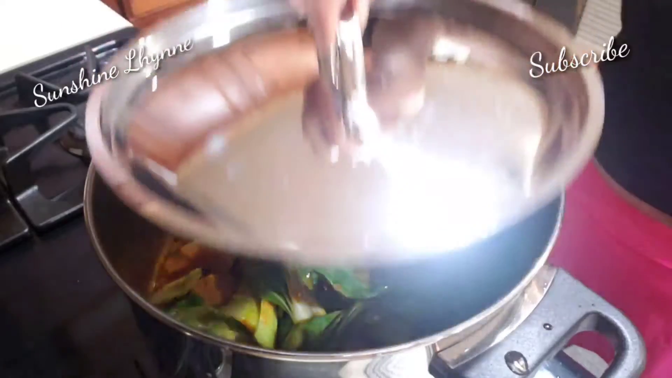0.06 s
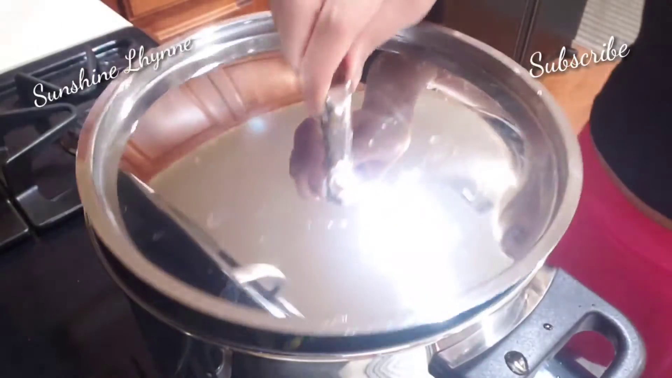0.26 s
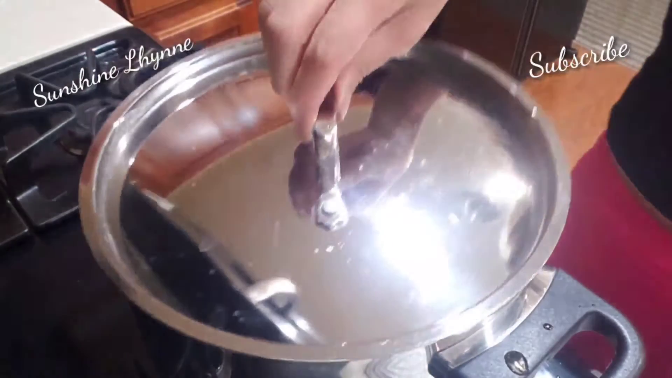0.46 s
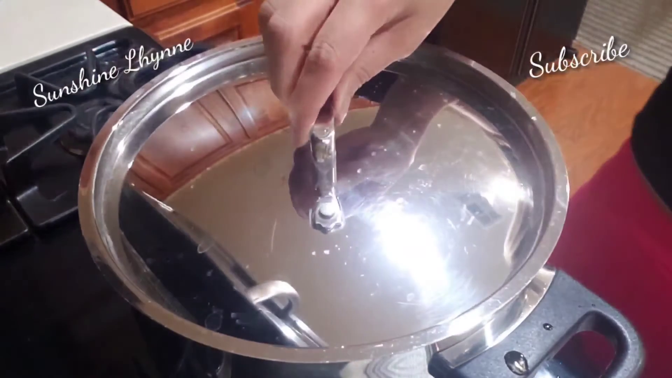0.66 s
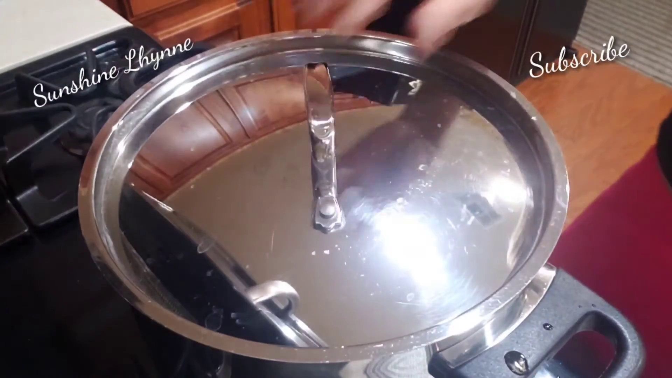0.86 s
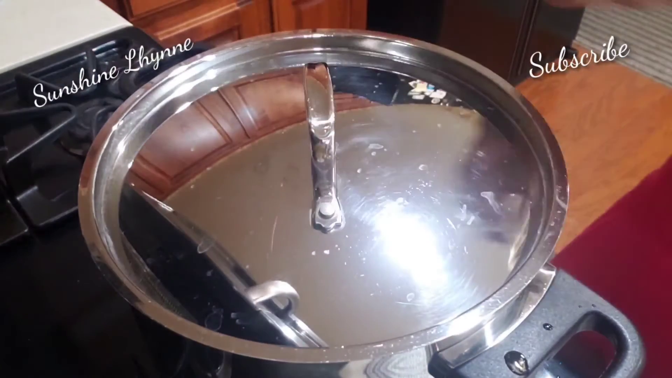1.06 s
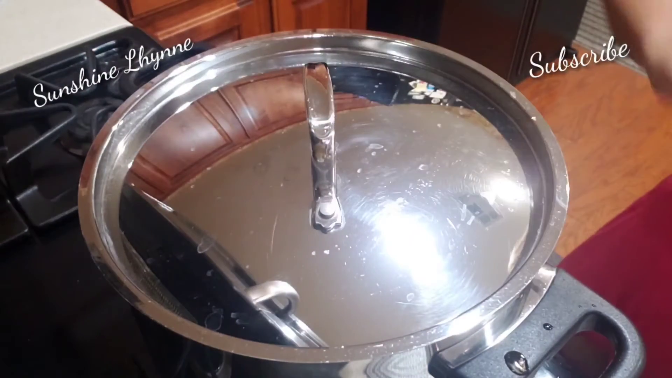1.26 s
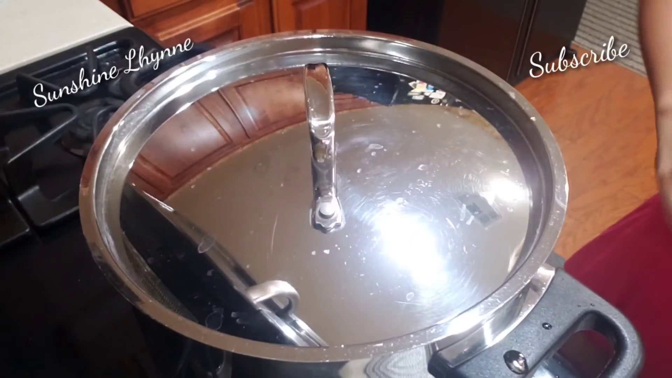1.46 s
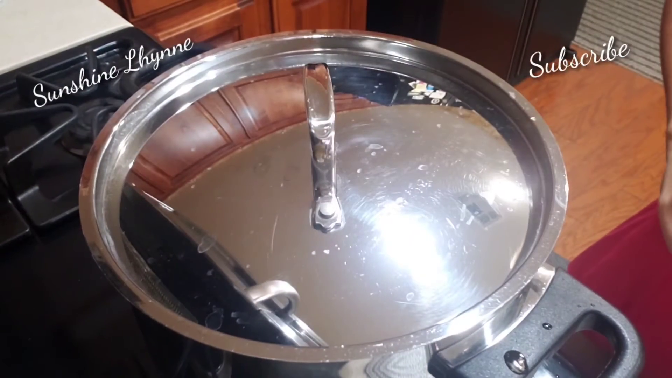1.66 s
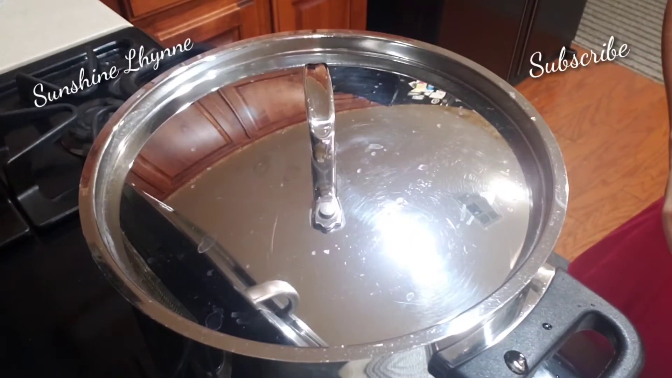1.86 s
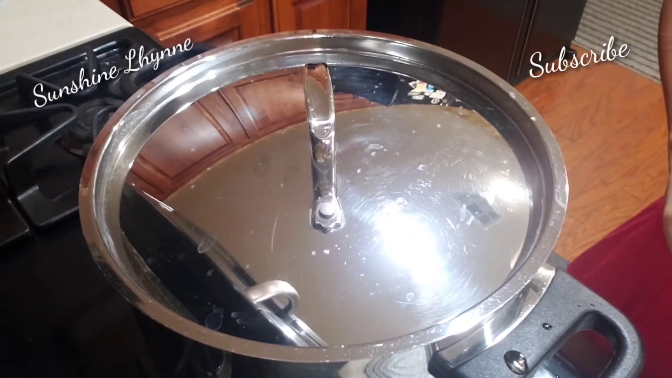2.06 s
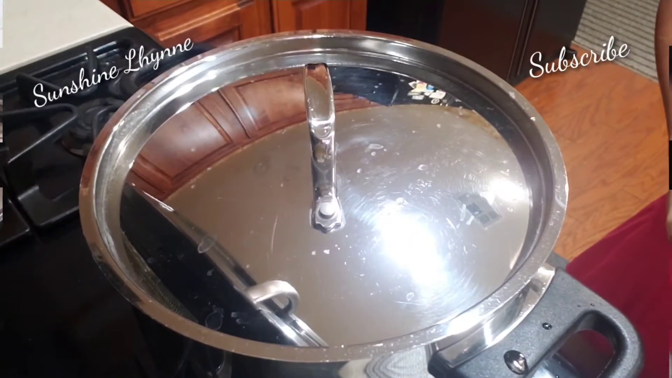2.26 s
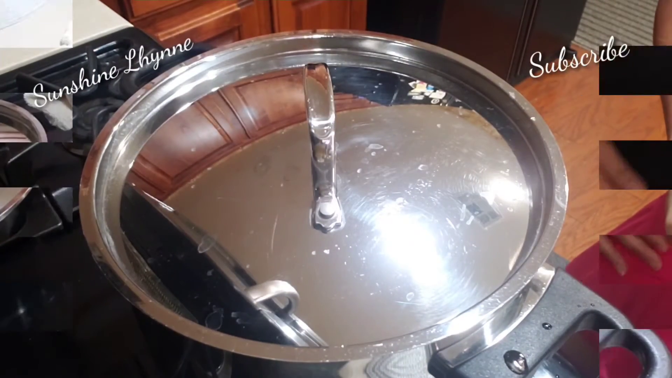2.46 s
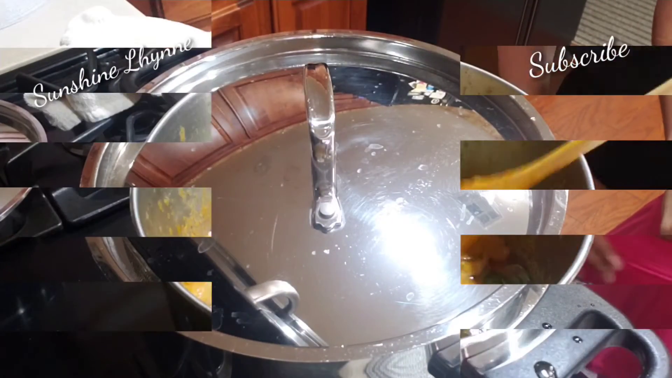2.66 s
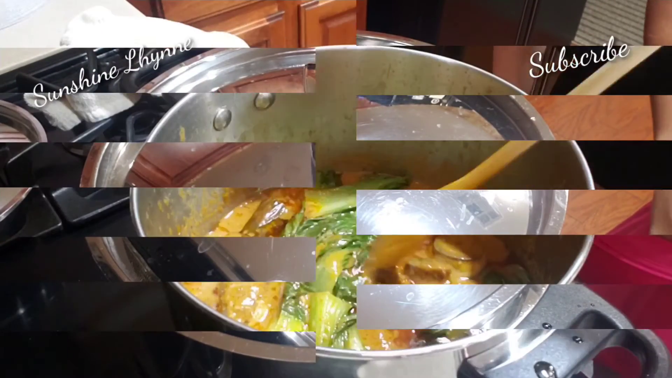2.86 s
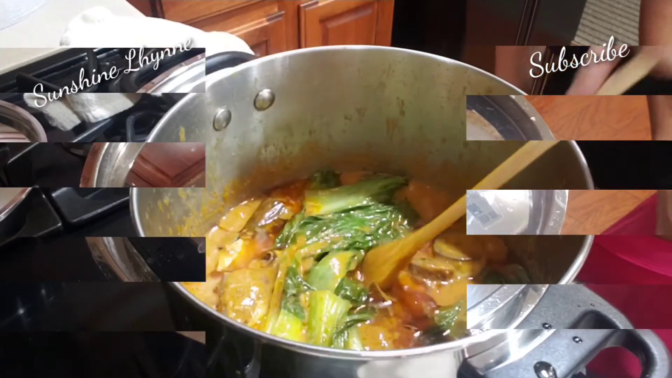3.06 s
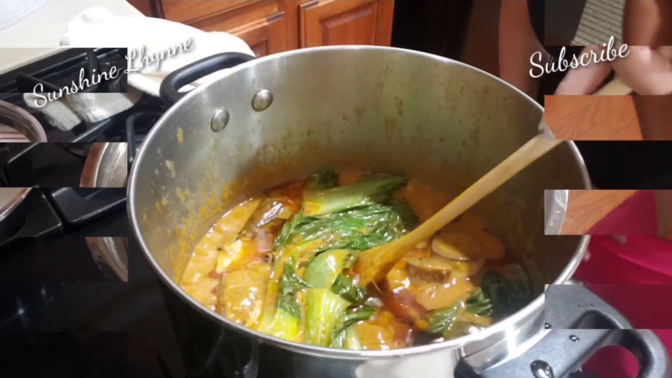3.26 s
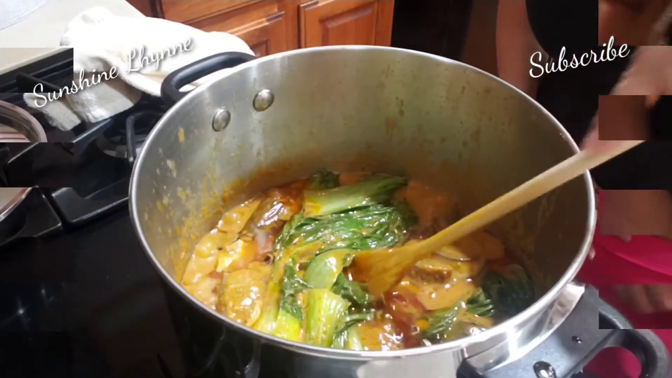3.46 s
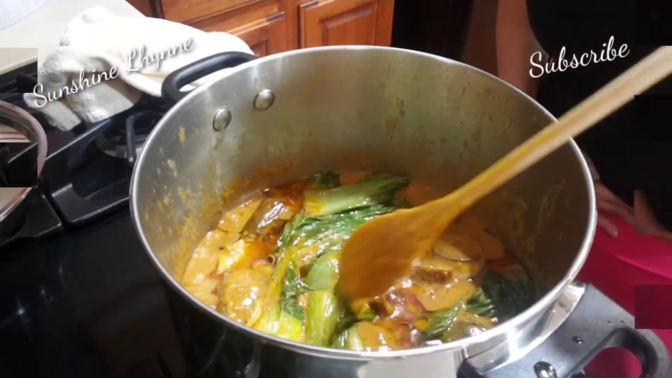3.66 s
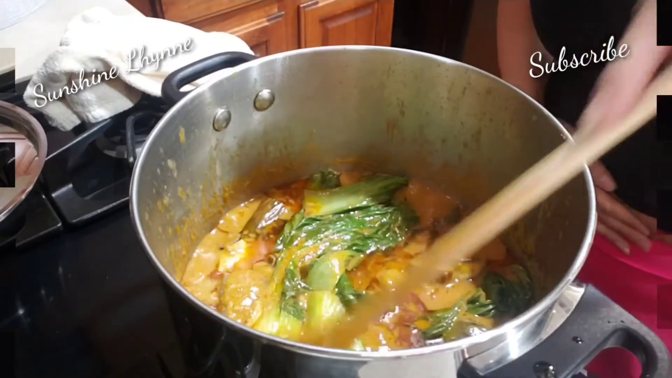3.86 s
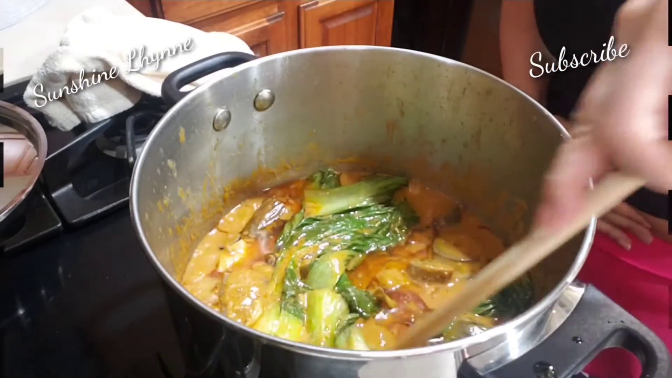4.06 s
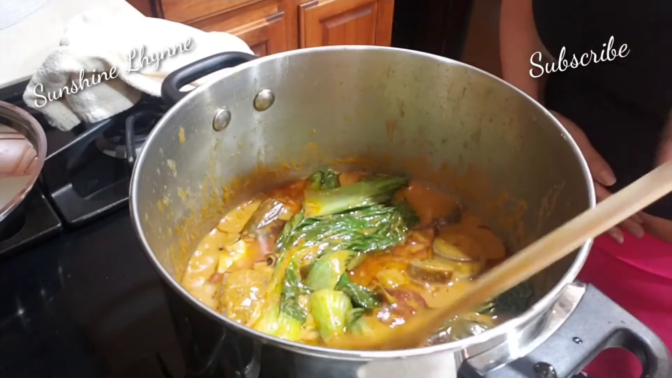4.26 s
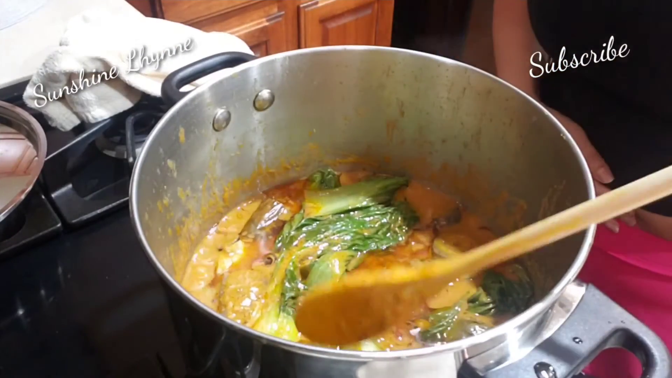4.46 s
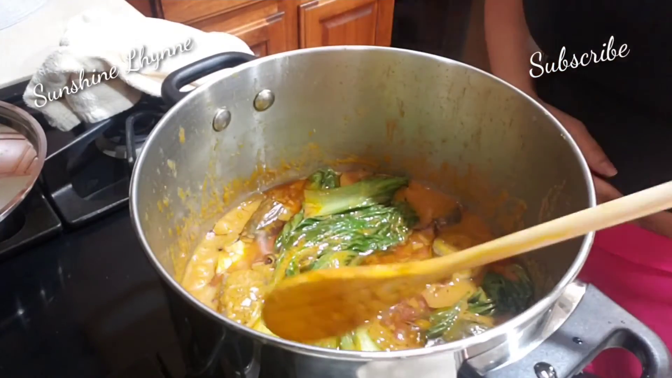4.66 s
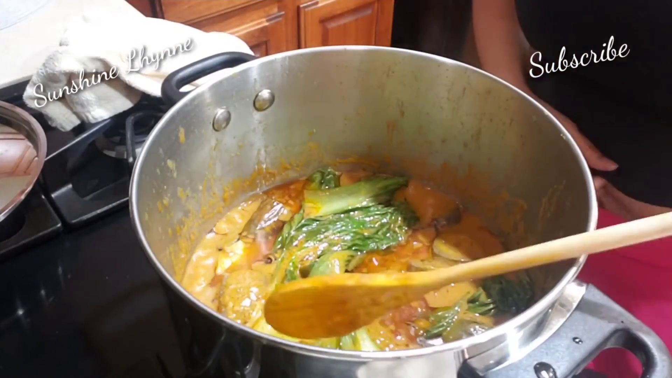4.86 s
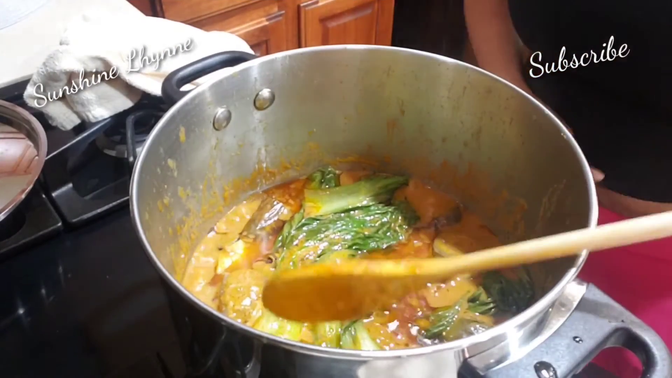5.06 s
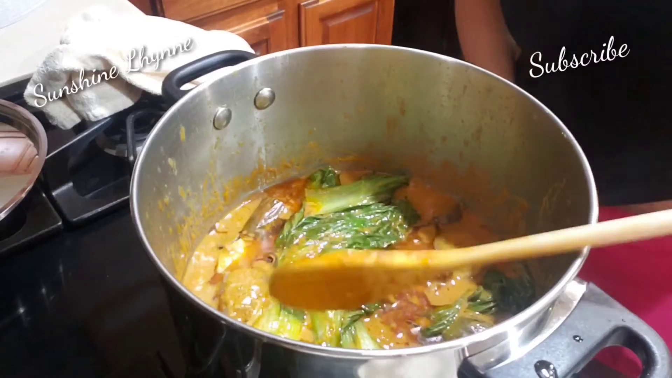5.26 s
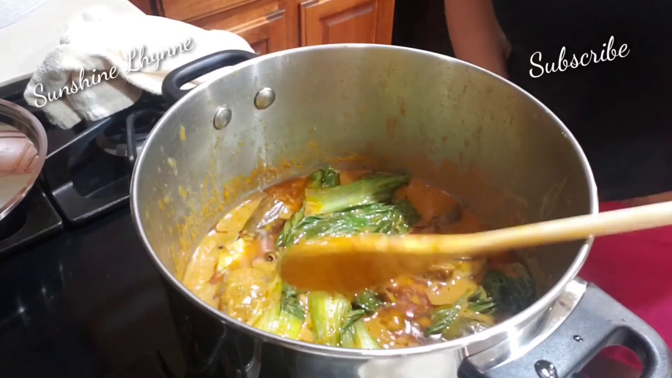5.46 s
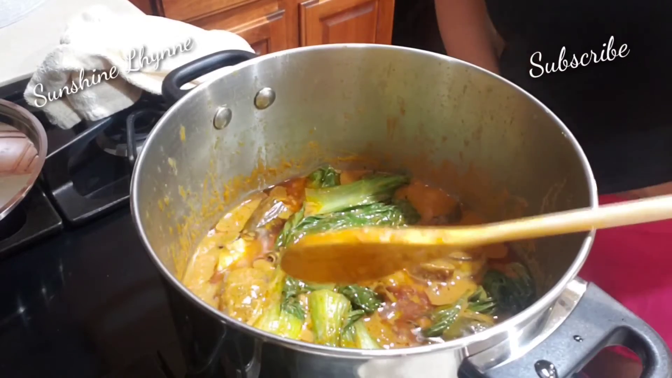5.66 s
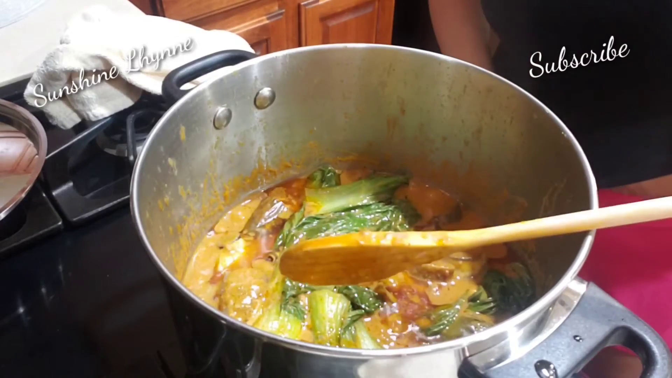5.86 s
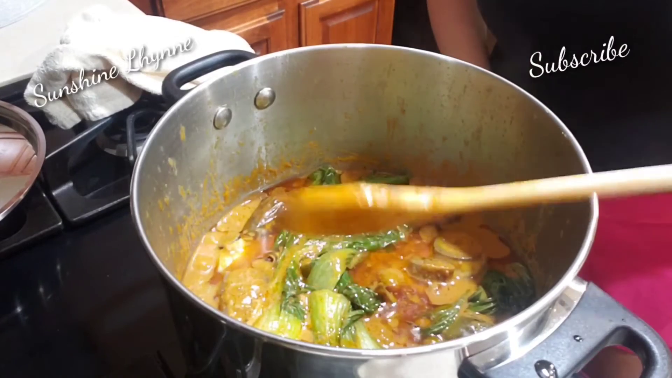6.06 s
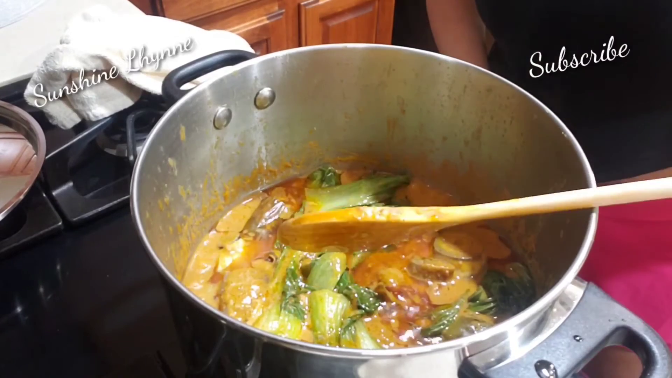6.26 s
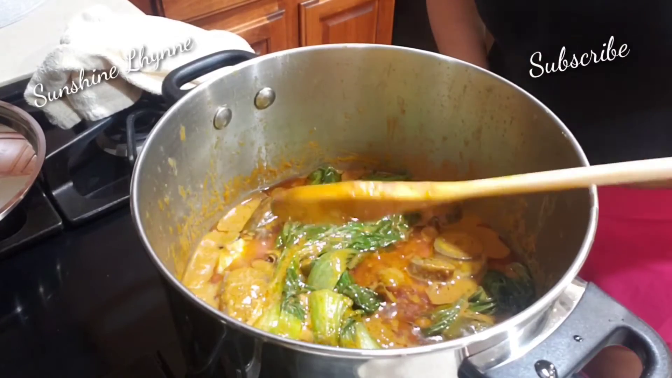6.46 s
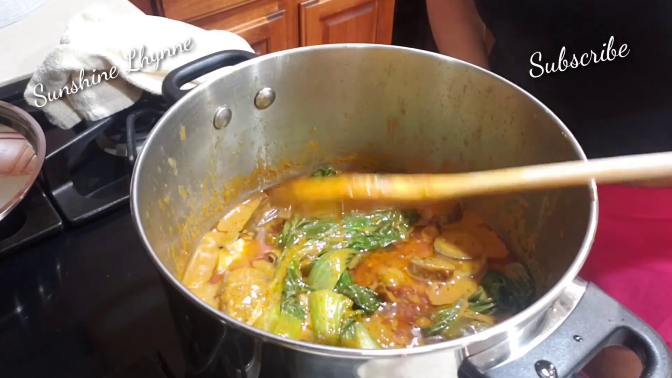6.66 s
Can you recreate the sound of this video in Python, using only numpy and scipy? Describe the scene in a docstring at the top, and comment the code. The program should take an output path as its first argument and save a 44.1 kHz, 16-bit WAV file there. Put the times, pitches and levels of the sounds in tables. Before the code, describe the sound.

A low, wavering appliance hum near 57 Hz, soft rumble and faint hiss run throughout, heard close to a stove in stereo with a short tiled-kitchen echo. Around 0.1 to 0.3 s there is a light knock and small wet pops. At 0.4 to 0.5 s a steel lid touches the pot with ringing taps, then clanks loudly at 0.56 and settles in a rapid clatter at 0.63 to 0.68, its ring soon fading. At 1.6 s it rocks in three weakening ticks. The hum sinks until about 2.9 s, when wet stirring begins: squelch, crackle, tiny pops, soft knocks at 3.3 to 4.1. Stirring thickens, with a sharp crack at 4.94 and wooden raps from 5.2 to 5.9. A hard clank with lasting metallic notes hits at 6.11, another knock at 6.25, then strong pops and a last rap near 6.65. Noise swells briefly after each knock.

```python
"""Close to a stove, in stereo: a wavering appliance hum and faint kitchen noise run throughout.
Light knocks and wet pops come early; a steel lid then meets the pot in eight contacts and settles,
ringing in the modes of its pose, and later rocks in three weaker ticks. After that a wooden spatula drags
through thick stew, with pops, plops, crackle and raps (crack, wood, thud). Near the end hard blows clank
on the pot wall. After each knock the background noise swells and falls back."""
import sys
import numpy as np
from scipy import signal
from scipy.fft import rfft, irfft, next_fast_len
from scipy.io import wavfile
from scipy.ndimage import uniform_filter1d

SR = 44100
rng = np.random.default_rng(int(sys.argv[2]) if len(sys.argv) > 2 else 0)


def dump(signal):
    """Clip the signal to [-1, 1] and save it as 16-bit WAV at the path in sys.argv[1]."""
    limited = np.clip(np.atleast_2d(signal).T, -1, 1)
    pcm = np.round(limited * 32767).astype(np.int16)
    wavfile.write(sys.argv[1], SR, pcm)


N = 296352

# dull body of a knock: (frequency [Hz], relative density [dB per Hz])
THUD = [(59, -17.5), (100, -2.5), (480, 5), (1000, 1), (1400, -14), (2400, -25), (3380, -49.5),
        (17600, -120)]
# dense short ringing of lid on rim: (frequency [Hz], relative density [dB per Hz])
CLATTER = [(41, -44), (70, -6.5), (400, -22.5), (1020, -21.5), (1200, -19.5), (1650, -10), (1980, -25.5),
           (2220, -19), (4800, -29), (5500, -38.5), (6160, -29), (16000, -27)]


def undb(db):
    """Amplitude factor of a level in dB."""
    return 10 ** (np.asarray(db) / 20)


def unit(x):
    """Scale to rms 1."""
    return x / np.sqrt(np.mean(x ** 2))


def noise(spectrum, size, alike_hz=900, lines_db=0.):
    """Coloured noise, alike at both microphones in the bass, unrelated in the treble; lines_db makes it peaky."""
    fast = next_fast_len(size)
    hz = np.arange(fast // 2 + 1) * SR / fast + 1e-3
    at, db = np.transpose(spectrum)
    colour_db = np.interp(np.log(hz), np.log(at), db, left=-90, right=-90)
    # each random peak or dip is eight bins wide
    peaks_db = lines_db * np.repeat(rng.standard_normal(len(hz) // 8 + 1), 8)[:len(hz)]
    mid, side = rfft(rng.standard_normal((2, fast)))
    side = side * hz ** 2 / (hz ** 2 + alike_hz ** 2)
    left_right = np.array([mid + side, mid - side])
    return unit(irfft(undb(colour_db + peaks_db) * left_right, fast))[:, :size]


def walk(rate):
    """Random wander: values held for 1 / rate seconds, then smoothed twice over that time."""
    hold = int(SR / rate)
    steps = np.repeat(rng.standard_normal(N // hold + 1), hold)
    return 0.92 * uniform_filter1d(uniform_filter1d(steps, hold), hold)[:N]


def fade(t60, size):
    """Exponential decay by 60 dB in t60 seconds."""
    return np.exp(-np.log(1000) * np.arange(size) / (max(t60, .002) * SR))


def ring(modes, size, spread=1.0):
    """One blow on a set of modes, each wavering in level and differing in phase between the microphones."""
    beat_hz, beat_share = 9, .35  # the rate is scaled at random for each mode
    t, out = np.arange(size) / SR, np.zeros((2, size))
    for (hz, db, t60), chance in zip(modes, rng.standard_normal((len(modes), 3))):
        strength = undb(db + 1.2 * chance[0])
        shift = spread * chance[1] * min(hz / 1500, 1) * np.array([[.5], [-.5]])
        beat = 1 + beat_share * np.sin(2 * np.pi * beat_hz * chance[2] * t)
        out += strength * fade(t60, size) * beat * np.sin(2 * np.pi * hz * t + shift)
    return out * (1 - np.exp(-t / 0.00065))


def burst(spectrum, db, t60, attack=0.00048, lines_db=7.0):
    """Countless short-lived modes, heard as peaky noise that dies away unevenly."""
    steps = np.repeat(rng.standard_normal(64), 256)
    uneven = undb(2.5 * uniform_filter1d(steps, size=256))
    rise = 1 - np.exp(-np.arange(16384) / (attack * SR))
    return undb(db) * noise(spectrum, 16384, lines_db=lines_db) * fade(t60, 16384) * uneven * rise


def add(out, s, x):
    """Mix x into out from s seconds on."""
    i = int(s * SR)
    out[:, i:i + x.shape[1]] += x[:, :N - i]


def place(x, pan_db, lag):
    """Level difference (left over right) and arrival lag (samples, right later) between the two microphones."""
    left = x[0] * undb(pan_db / 2)
    right = np.roll(x[1], int(round(lag))) * undb(-pan_db / 2)
    return np.array([left, right])


def background_db(s):
    """Level that the hum wavers around at time s; the other steady layers follow it."""
    # hum level over time: (time [s], level [dB])
    hum_level = [(0, -39), (.15, -42), (0.899, -48), (1.3, -50.5), (2.33, -49.5), (2.4, -54.5),
                 (3.201, -52.5), (4.2, -47), (4.9, -42.5), (5.8, -42), (6.72, -41)]
    return np.interp(s, *np.transpose(hum_level))


def appliance_hum(level_db):
    """A low tone and its octave, both unsteady in pitch and level."""
    turn = 2 * np.pi * np.cumsum(56.85 + 1.6 * walk(12)) / SR  # centre and wander in Hz
    waver_db = 2.2 * walk(12)
    octave = undb(-17 + 8.9 * walk(6.6)) * np.sin(2 * turn)
    return np.sqrt(2) * undb(level_db + waver_db) * (np.sin(turn) + octave)


def kitchen_noise(level_db):
    """Wandering low kitchen noise and a steadier hiss, at set distances below the hum."""
    # faint rumble of the kitchen: (frequency [Hz], relative density [dB per Hz])
    rumble_colour = [(41, -35), (70, -4.5), (86, -15), (123, -16), (256, -26), (294, -15), (366, -29),
                     (406, -28.5), (611, -27.5), (669, -37.5), (1500, -57.5), (1950, -87.5), (3300, -120)]
    # faint hiss: (frequency [Hz], relative density [dB per Hz])
    hiss_colour = [(590, -37.5), (1000, -10), (1180, -9), (1350, -12.5), (2100, -8.5), (4170, -17.5),
                   (16000, -20.5)]
    rumble = undb(level_db - 12.5 + 0.5 * walk(10)) * noise(rumble_colour, N)
    return rumble + undb(level_db - 31.5) * noise(hiss_colour, N)


def swelling_noise(swell):
    """Background noise that follows the bass and treble swells, each with its own flicker."""
    # the noise that swells: (frequency [Hz], relative density [dB per Hz])
    swell_colour = [(41, -31.5), (70, -3.5), (223, -6.5), (695, -25.5), (853, -20), (1150, -26),
                    (1280, -23.5), (8090, -46), (10900, -42.5), (16000, -57.5)]
    full = noise(swell_colour, N)
    bass = signal.sosfiltfilt(signal.butter(2, 900, fs=SR, output="sos"), full)
    treble = full - bass
    bass_flicker_db, treble_flicker_db = 3 * walk(30), 3 * walk(60)
    return swell[0] * undb(bass_flicker_db) * bass + swell[1] * undb(treble_flicker_db) * treble


def pop(hz, cycles):
    """A bubble bursting: a few cycles that swell, fade and glide up."""
    turn = np.arange(512) / SR * hz  # in cycles
    envelope = (1 - np.exp(-turn)) * np.exp(-turn / cycles)
    return envelope * np.sin(2 * np.pi * turn * (1 + 0.0074 * turn)) * np.ones((2, 1))


def bubbles():
    """Bursting bubbles, each with a wet hiss, and deeper plops that ring briefly."""
    # wet pops of the stew: (time [s], relative level [dB], starting pitch [Hz])
    wet_pops = [(0.092, -55.5, 6000), (.301, -57.5, 8500), (3.015, -63.5, 10400), (3.078, -60, 9500),
                (3.092, -62, 4500), (3.127, -63, 5570), (3.25, -58.5, 8800), (3.405, -53, 5900),
                (3.885, -55, 10770), (3.2378, -57.5, 11000), (3.274, -58, 5400), (3.3009, -60, 4600),
                (3.85, -51, 3830), (3.9976, -56, 8000), (4.106, -57, 5400), (4.16, -61, 2500),
                (4.1786, -50, 4770), (4.275, -51.5, 6600), (4.29, -58, 3300), (4.5221, -58, 7500),
                (4.61, -54.5, 5440), (4.6728, -57, 7750), (4.699, -44, 9100), (4.7837, -52.5, 4350),
                (4.904, -56, 4900), (5.252, -48.5, 5800), (5.2807, -48, 4560), (5.5593, -59.5, 3730),
                (5.977, -51, 4660), (6.012, -43.5, 3640), (6.089, -46.5, 5570), (6.5362, -39.5, 7110),
                (6.552, -45.5, 3500), (6.572, -50.5, 5330)]
    # deeper plops: (time [s], relative level [dB], pitch [Hz])
    deep_plops = [(4.269, -61, 1600), (4.72, -61, 1580), (4.812, -57, 1850)]
    out = np.zeros((2, N))
    for s, db, hz in wet_pops:
        wet_colour = [(hz / 2.7, -20), (hz, 0), (min(1.6 * hz, 16000), -16)]
        add(out, s, undb(db) * pop(hz, 5.5))
        add(out, s, undb(db - 6) * noise(wet_colour, 2048) * fade(0.037, 2048))
    for s, db, hz in deep_plops:
        plop_colour = [(hz / 2.5, -14), (hz, 0), (3 * hz, -14)]
        add(out, s, undb(db) * ring([(hz, 0, .03), (1.12 * hz, -2, .02)], 4096))
        add(out, s, burst(plop_colour, db - 4, .09, lines_db=3.))
    return out


def dragged_sauce():
    """The blade dragged through the sauce: 300 scattered small pops over four flickering bands of squelch."""
    # strength of the drag: (time [s], relative level [dB])
    drag_level = [(2.8, -76), (3.1, -69.5), (3.5, -73.5), (4.15, -66.5), (4.3, -63), (4.5, -71),
                  (4.75, -60), (4.9, -68), (5.3, -61.5), (6.5, -56.5), (6.72, -66)]
    out = np.zeros((2, N))
    at, db = np.transpose(drag_level)
    for when, pitch, size in rng.random((300, 3)):
        s = at[0] + when * (at[-1] - at[0])
        pop_db = np.interp(s, at, db) - 4 * np.log(size + .02)  # a few come out much louder
        add(out, s, undb(pop_db) * pop(3000 * 4 ** pitch, 4.))
    drag_db = np.interp(np.arange(N) / SR, at, db, left=-120)
    for hz in (3000, 4770, 8000, 12430):
        band = noise([(hz / 2, -18), (hz, 0), (hz * 2, -18)], N)
        out += undb(drag_db - 19 + 6 * walk(30)) * band
    return out


def stew():
    """Bubbles and dragged sauce, reaching the right microphone a little late."""
    return place(bubbles() + dragged_sauce(), 0.27, 14)


def knocks_and_swell():
    """A crack, a thud and, from the blade, ringing wood; also returns the bass and treble swells that follow."""
    # knocks: (time [s], struck by, crack level [dB], thud level [dB])
    knocks = [(0.099, "other", -60, -55.5), (0.632, "other", -62, -23), (1.589, "other", -54.5, -43.5),
              (2.901, "other", -83, -64.5), (3.329, "other", -45.5, -61.5), (3.338, "other", -81, -41.5),
              (3.651, "other", -45.5, -47.5), (3.804, "other", -58, -56), (4.061, "blade", -53.5, -48),
              (4.937, "other", -32, -43.5), (5.165, "blade", -39, -44.5), (5.386, "blade", -32.5, -45),
              (5.602, "blade", -30, -50), (5.652, "blade", -37, -44), (5.812, "blade", -32, -40),
              (5.936, "blade", -51.5, -50), (6.111, "other", -65, -29), (6.245, "other", -26, -43),
              (6.655, "other", -33.5, -42)]
    # sharp onset: (frequency [Hz], relative density [dB per Hz])
    crack_colour = [(180, -40.5), (300, -25.5), (565, -18.5), (1080, -8), (1390, -24.5), (2880, -10.5),
                    (6740, -20.5), (12300, -28.5), (16000, -47)]
    # wooden blade: (frequency [Hz], relative level [dB], decay by 60 dB [s])
    wood_modes = [(1000, 5, 0.13), (1078, 13, 0.05), (2110, 2, 0.035), (2810, 3, 0.04), (4300, -2, 0.025),
                  (7340, 9, 0.012)]
    wood_db = -10  # against the crack
    hold_s, swell_db, faint_swell_db = .12, -0.54, -5.5  # limits: against the hum, against the crack
    boom_db, boom_fade_s = -13.5, .16  # the bass lingers after a thud
    out, swell = np.zeros((2, N)), np.zeros((2, N))
    t = np.arange(32768) / SR
    late = np.maximum(t - hold_s * np.array([[1], [.7]]), 0)  # the treble lets go first
    shape = (1 - np.exp(-t / 0.0058)) * np.exp(-late / np.array([[.06], [.035]]))
    for s, struck_by, crack_db, thud_db in knocks:
        add(out, s, burst(crack_colour, crack_db, 0.05, attack=0.001))
        if struck_by == "blade":
            add(out, s, undb(crack_db + wood_db) * ring(wood_modes, 8192))
        add(out, s, burst(THUD, thud_db, 0.12, attack=0.002, lines_db=4.0))
        peak_db = min(background_db(s) + swell_db, crack_db + faint_swell_db)
        add(swell, s, undb(peak_db) * shape)
        add(swell[:1], s, undb(thud_db + boom_db) * np.exp(-t[None] / boom_fade_s))
    return place(out, 1.4, 14), swell


def tilted_clatter(tilt_db):
    """Clatter colour with its treble above 2 kHz sloped by tilt_db per octave."""
    return [(hz, db + tilt_db * np.log2(max(hz / 2000, 1))) for hz, db in CLATTER]


def lid_contacts():
    """Each contact rings the modes of its pose until a choke time, clatters on the rim and bumps dully."""
    # lid contacts: (time [s], pose, ring level [dB])
    contacts = [(.399, "held", -22), (.434, "held", -29.5), (0.508, "held", -29), (.559, "tilted", -15.5),
                (.628, "seated", -17), (.643, "seated", -17), (.661, "seated", -16),
                (0.679, "seated", -35.5)]
    # the lid rings differently as more of its edge touches the pot:
    # pose -> modes (frequency [Hz], relative level [dB], decay by 60 dB [s])
    pose_modes = {"held": [(320, 0, .09), (430, -13, .12), (1000, -9, .1), (1230, -13, .15),
                  (1629, -10, .5), (1649, -6, .6), (1852, -18, .5), (2417, -17, .4), (2606, -6.5, .75),
                  (3079, -17, 1.5), (3526, -10, .9), (4834, -17, .4), (7335, -20, .2), (7817, -23, .3)],
                  "tilted": [(735, -7, .07), (1050, -8, .07), (1486, 2, .17), (1649, -13, .28),
                  (2606, -15, .9), (3526, -23, .6), (7580, -16, .04), (9798, -25, .15), (10750, -26, .4)],
                  "seated": [(735, -11, .12), (1000, -13, .2), (1050, -13, .16), (1420, -12, .1),
                  (1488, -1, .12), (1640, 0, .13), (1685, 0, .14), (2250, -9, .36), (2697, -17, .28),
                  (3074, -19, .32), (3338, -42, 1.2), (3540, -20, .27), (3978, -16, .21), (4107, -33, .8),
                  (4730, -15, .1), (4990, -47, .7), (6560, -43, .9), (7100, -46, .8), (8350, -44, .7)]}
    # when the next touch stops the ringing: pose -> time [s]
    choke_at = {"held": .557, "tilted": 0.68, "seated": 3}
    # pose -> (level above the ring [dB], decay by 60 dB [s], treble slope [dB per octave])
    pose_clatter = {"held": (-4, 0.26, -4.2), "tilted": (-7.5, .2, -2), "seated": (-0.71, .15, -0.1)}
    out = np.zeros((2, N))
    for s, pose, ring_db in contacts:
        choked = np.maximum(np.arange(40000) / SR - (choke_at[pose] - s), 0)
        clatter_db, t60, tilt_db = pose_clatter[pose]
        add(out, s, undb(ring_db) * ring(pose_modes[pose], 40000) * np.exp(-choked / 0.0087))
        add(out, s, burst(tilted_clatter(tilt_db), ring_db + clatter_db, t60, lines_db=5.5))
        add(out, s, burst(THUD, ring_db - 7.5, .07, attack=0.0014))
    return out


def lid_rocking():
    """The resting lid rocks: three ever weaker ticks at even gaps, each a clatter, a thud and a low ring."""
    # low body of a tick: (frequency [Hz], relative level [dB], decay by 60 dB [s])
    body_modes = [(120, 0, 0.087), (487, -3, 0.12)]
    start_s, gap_s, t60 = 1.603, 0.053, 0.09
    clatter_db, thud_db = -48, -44.5  # first tick
    out = np.zeros((2, N))
    for k in range(3):
        s = start_s + k * gap_s
        add(out, s, burst(CLATTER, clatter_db - 4 * k, t60, attack=0.0017, lines_db=5.0))
        add(out, s, burst(THUD, thud_db - 3 * k, t60, attack=0.0032, lines_db=5.0))
        add(out, s, undb(thud_db) * ring(body_modes, 8192))
    return out


def lid():
    """Contacts, a faint dense shimmer once the lid is down, then rocking; the middle range leans right."""
    out = lid_contacts() + lid_rocking()
    add(out, .678, burst(tilted_clatter(-4), -38, 0.47, attack=.02))
    # the middle range radiates towards the right
    middle = signal.sosfiltfilt(signal.butter(1, [800, 6000], "band", fs=SR, output="sos"), out)
    return place(out - middle, 5.4, 0) + place(middle, -3.5, 0)


def pot_wall():
    """Hard blows on the wall: a dense clank with a few lasting notes."""
    # blows: (time [s], ring level [dB], clank level [dB], clank decay by 60 dB [s])
    blows = [(6.109, -38, -30, 0.046), (6.118, -28.5, -25.5, 0.14), (6.135, -39, -29.5, 0.38),
             (6.244, -46, -39, 0.44)]
    # notes of the pot: (frequency [Hz], relative level [dB], decay by 60 dB [s])
    pot_modes = [(390, -2, .08), (765, -2, .1), (1327, -5, .14), (1642, 0, .11), (2309, -4, .18),
                 (2966, -19, 1.1), (3052, -7, .55), (3338, -23, 1.4), (3639, -18, .8), (4100, -22, .9),
                 (4750, -4, .04), (5030, -20, 1.2), (5126, -24, 1.1), (5556, -20, 1.2), (6202, -18, .45)]
    # dense short ringing of the wall: (frequency [Hz], relative density [dB per Hz])
    clank_colour = [(120, -46.5), (200, -37), (409, 2.5), (612, -15), (749, -7.5), (1680, -12),
                    (2020, -11.5), (3070, -16.5), (15100, -35.5), (16000, -65)]
    out = np.zeros((2, N))
    for s, ring_db, clank_db, t60 in blows:
        add(out, s, undb(ring_db) * ring(pot_modes, 32768, spread=0.59))
        add(out, s, burst(clank_colour, clank_db, t60, attack=0.00049))
    return place(out, 2.4, 14)


def room(x):
    """Tiled kitchen: a short decaying tail, different at each side."""
    t60_s, tail_db = 0.25, -9
    band = signal.butter(1, [500, 6000], "band", fs=SR, output="sos")
    tail = signal.sosfilt(band, rng.standard_normal((2, 16384))) * fade(t60_s, 16384)
    tail /= np.sqrt(np.sum(tail ** 2, axis=1, keepdims=True))
    return x + undb(tail_db) * signal.fftconvolve(x, tail, axes=1)[:, :N]


def scene():
    """Sounds at the stove echo in the room; the background layers get no added echo."""
    hum_db = background_db(np.arange(N) / SR)
    knocks, swell = knocks_and_swell()
    background = appliance_hum(hum_db) + kitchen_noise(hum_db) + swelling_noise(swell)
    at_the_stove = stew() + knocks + lid() + pot_wall()
    return room(at_the_stove) + place(background, 2.4, 6)


def record(dry):
    """The phone's microphone cuts the deep bass below 40 Hz and the top above 15.6 kHz."""
    thin = signal.sosfilt(signal.butter(2, 40, "high", fs=SR, output="sos"), dry)
    return signal.sosfilt(signal.ellip(8, .2, 70, 15600, fs=SR, output="sos"), thin)


dry = scene()
out = record(dry)
dump(out)
```